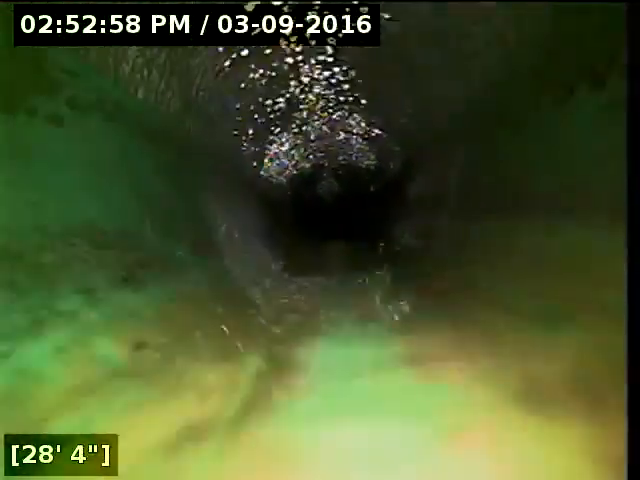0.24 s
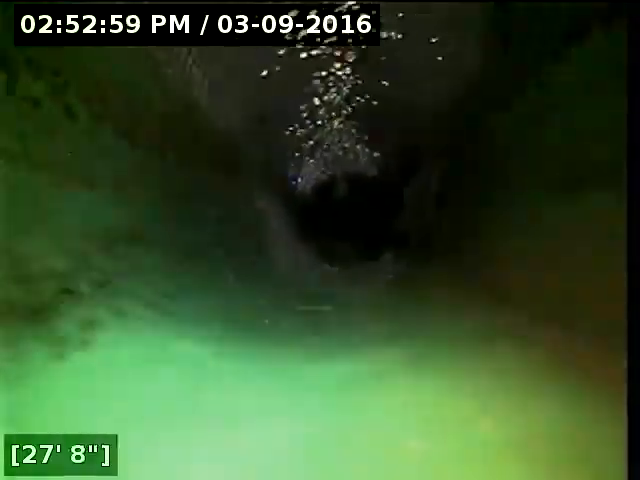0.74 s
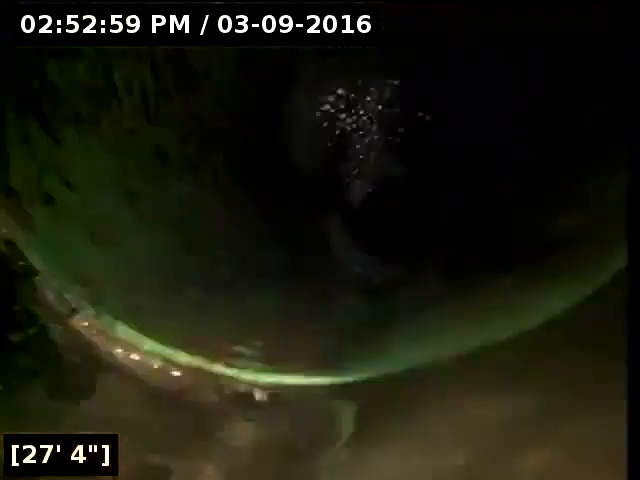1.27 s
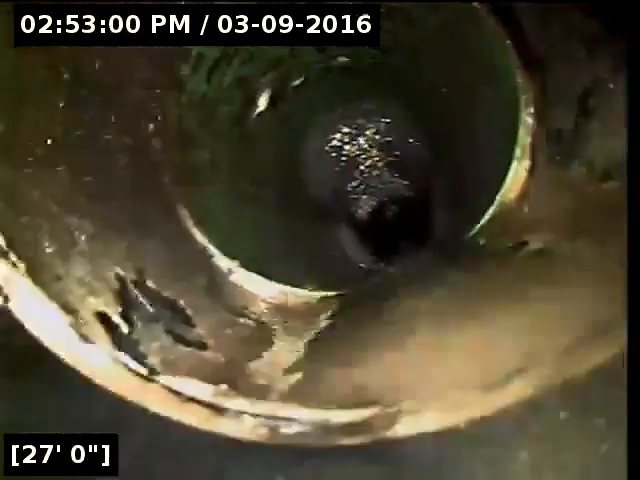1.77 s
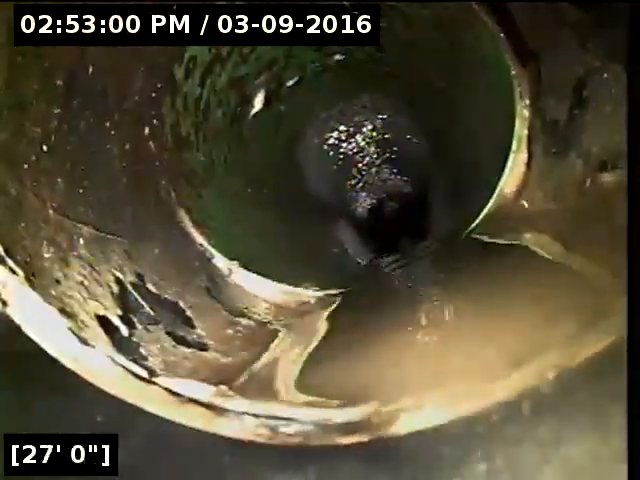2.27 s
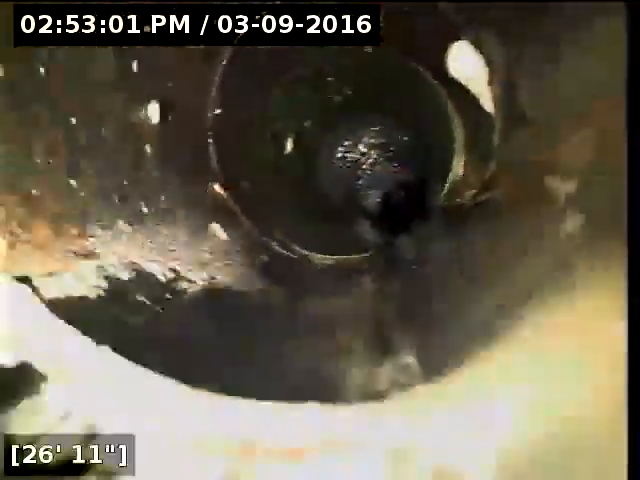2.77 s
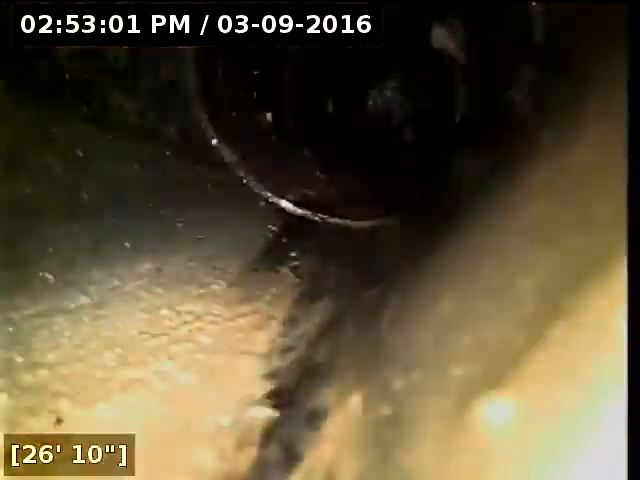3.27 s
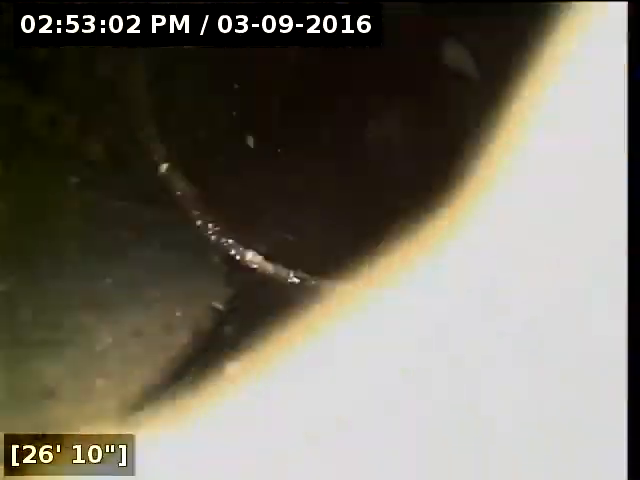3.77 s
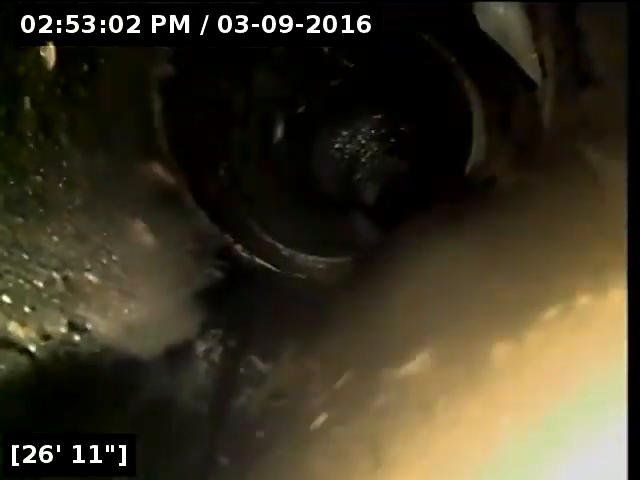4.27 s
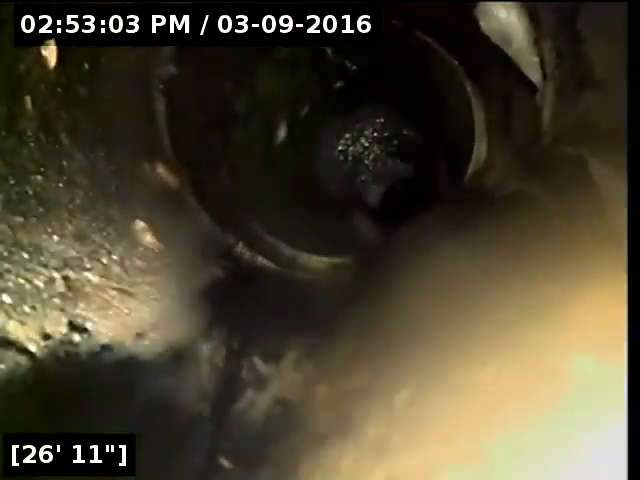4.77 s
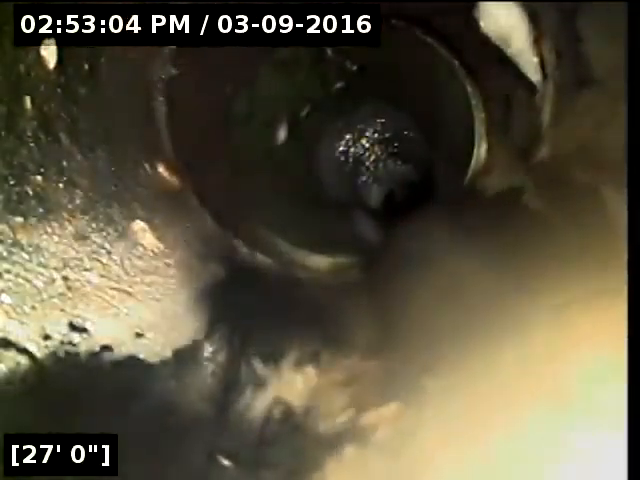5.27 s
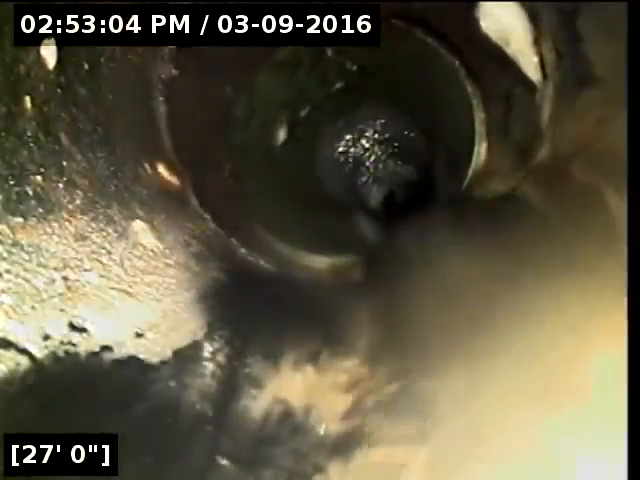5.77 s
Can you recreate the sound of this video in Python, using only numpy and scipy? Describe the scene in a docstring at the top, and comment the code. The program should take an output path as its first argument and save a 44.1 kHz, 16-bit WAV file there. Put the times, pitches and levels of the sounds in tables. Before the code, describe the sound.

A stiff drain camera cable is dragged back by hand, ticking and snapping over a dull rub, with an early knock and a loud late clatter.

```python
"""The stiff push cable of a drain inspection camera ticks and snaps against its reel as it is pulled back by hand.
Snaps are short damped rings; the reel frame, a set of modes struck or rubbed, knocks early and later clatters twice.
Under it lie the cable's rub and drone, one faint squeak with a thin whistle, a scrape, a low hum and hiss:
shaped noise and gliding lines. The small microphone of the monitor is narrow-band; the sound drops out once, briefly."""
import sys
import numpy as np
from scipy import signal
from scipy.fft import rfft, irfft
from scipy.io import wavfile
from scipy.ndimage import uniform_filter1d, map_coordinates

SR = 44100
rng = np.random.default_rng(int(sys.argv[2]) if len(sys.argv) > 2 else 0)


def inscribe(sig):
    """Save sig as 16-bit PCM at rate SR to the path in sys.argv[1].

    A 1-D sig is mono; a 2-D sig holds one channel per row.
    Samples are clipped to [-1, 1] before scaling.
    """
    pcm = np.round(np.clip(np.atleast_2d(sig).T, -1, 1) * 32767)
    wavfile.write(sys.argv[1], SR, pcm.astype(np.int16))


N = 265482


def amp(db):
    """Decibels to gain."""
    return 10 ** (np.asarray(db) / 20)


def evened(x, size=None):
    """Scales x so that its first samples (all by default) have rms 1."""
    return x / np.sqrt(np.mean(x[:size] ** 2) + 1e-20)


def read(points, hz):
    """Reads a table on a log-frequency axis."""
    f, value = np.transpose(points)
    return np.interp(np.log(hz + 1), np.log(f + 1), value)


def coloured(x, points):
    """Filters x by a spectrum in dB."""
    gain = amp(read(points, np.fft.rfftfreq(len(x), 1 / SR)))
    return irfft(rfft(x) * gain, len(x))


def softened(x, hz):
    """Low-pass: a contact of finite length cannot excite anything far above hz."""
    return signal.sosfilt(signal.butter(4, min(hz, SR / 3), fs=SR, output="sos"), x)


def add(mix, start_s, sound):
    """Lays a sound into the mix at start_s."""
    part = mix[max(round(start_s * SR), 0):][:len(sound)]
    part += sound[:len(part)]


def wander(knots_per_s):
    """Smooth random curve of rms 1 through so many random knots a second."""
    knots = rng.standard_normal(8000)
    return evened(map_coordinates(knots, [np.arange(N) * knots_per_s / SR], order=3, mode="wrap"))


def ring(t, hz, t60_s):
    """One mode: a sine that dies by 60 dB in t60_s."""
    return np.sin(2 * np.pi * hz * t) * amp(-60 * t / t60_s)


def contact(t, t60_s, rattle_db):
    """Force of a blow: one sharp push, then a dying rattle of tiny contacts at rattle_db relative to it."""
    force = rng.standard_normal(len(t)) * amp(-60 * t / t60_s)
    force *= amp(rattle_db) / np.linalg.norm(force)
    force[0] += 1
    return force


def tone(rows, rough, width_hz):
    """A gliding line, partly steady and partly blurred into narrow noise."""
    times, hz, db = np.transpose(rows)
    t = np.arange(N) / SR
    turn = np.exp(2j * np.pi * np.cumsum(np.interp(t, times, hz)) / SR)
    blur = 1 - rough + rough * (wander(width_hz) + 1j * wander(width_hz))
    gain = amp(np.interp(t, times, db, left=-120, right=-120))
    return gain * evened((turn * blur).real)


# How hard the sliding cable rubs. Each row: time in seconds, reference level in dB.
PULL_LEVELS = np.vstack([ [(0.0, -52), (0.42, -46.5), (0.53, -50.5), (1.31, -50.5), (1.58, -55),
               (1.85, -55), (2.11, -55), (2.24, -51), (2.9, -52.5)], [(3.45, -55.5), (3.64, -52),
               (4.18, -49), (4.35, -47), (4.59, -50), (4.8, -49.5), (5.18, -49), (5.4, -48.5), (6.02, -45)],
               ])


def pull(s):
    """Reference level of the rub in dB at time s."""
    return np.interp(s, *np.transpose(PULL_LEVELS))


# Noise spectra of the sliding cable. Each row: frequency in Hz, relative density in dB.
RUMBLE_SPECTRUM = [(15, -56.5), (25, -32), (64, -20.5), (92, -7), (124, -3.5), (182, -2.5), (270, -6),
                   (358, -5), (437, -1.5), (524, -9.5), (805, -3), (1050, -13.5), (1200, -9), (1300, -19),
                   (1690, -23.5), (2860, -120)]
RUB_SPECTRUM = [(600, 0), (1000, -5), (1220, 3.5), (1500, -0.5), (2200, -2), (2900, -5), (3400, -19),
                (3900, -19.5), (4500, -43.5)]
HISS_SPECTRUM = [(3000, -12), (4300, -5), (5000, -1), (5800, 0.5), (7000, -2.5), (7700, -8.5),
                 (8300, -15.5)]
# Cable runs faster through the hand. Each row: start in seconds, length in seconds, rub in dB, hiss in dB.
STROKE_SWELLS = [(-.05, 0.32, -67, -57.5), (0.71, .1, -44.5, -73), (0.864, 0.32, -60.5, -58.5),
                 (1.276, 0.23, -51, -63), (3.659, 0.092, -52.5, -65), (3.913, 0.46, -58, -61),
                 (4.62, 0.11, -61, -52), (5.03, 0.15, -52, -60), (5.735, 0.23, -46.5, -62)]
STROKE_EASE_S, STROKE_RUMBLE_DB = 0.039, -2  # swell and fall time; rumble relative to the stroke's rub
EASY_PULL_DB = -52  # rumble and hiss follow the pull above this by a share
RUMBLE_DB, RUMBLE_SHARE, HISS_DB, HISS_SHARE = -47.5, 0.06, -65.5, 0.48


def sliding(flutter_db=2.0, flutter_per_s=45, rub_db=-1.5):
    """Dull rumble and dry rub noise flutter together under a smooth hiss; each stroke adds a swell."""
    t = np.arange(N) / SR
    effort_db = pull(t) - EASY_PULL_DB
    rumble = amp(RUMBLE_DB + RUMBLE_SHARE * effort_db)
    rub = amp(pull(t) + rub_db)
    hiss = amp(HISS_DB + HISS_SHARE * effort_db)
    for start_s, length_s, stroke_db, hiss_db in STROKE_SWELLS:
        edge_s = np.minimum(t - start_s, start_s + length_s - t)
        swell = np.clip(edge_s / STROKE_EASE_S, 0, 1)
        rumble = np.hypot(rumble, amp(stroke_db + STROKE_RUMBLE_DB) * swell)
        rub = np.hypot(rub, amp(stroke_db) * swell)
        hiss = np.hypot(hiss, amp(hiss_db) * swell)
    flutter = flutter_db * wander(flutter_per_s)
    layers = [(RUMBLE_SPECTRUM, rumble * amp(0.58 * flutter)), (RUB_SPECTRUM, rub * amp(flutter)),
              (HISS_SPECTRUM, hiss)]
    return sum(gain * evened(coloured(rng.standard_normal(N), shape)) for shape, gain in layers)


FIZZ_DB, FIZZ_FROM_HZ, FIZZ_DB_PER_HZ = -25, 1450, 0.0115  # the higher a snap, the more it fizzes


def click(db, hz, fizz_db, body_db=-23, body_t60_s=0.023, crack_db=-5, crack_hz=2650,
          thud_db=-15, thud_hz=300, reach_hz=1550):
    """A snap of a few cycles with a sharp crack, the short ring of the coil behind it, and a bright fizz."""
    t = np.arange(2000) / SR
    # light ticks are short and gritty, hard snaps swell and ring cleanly
    hard = np.clip((db + 33.5) / 20, 0, 1)
    swell = 1 - np.exp(-t / (0.0001 + 0.00043 * hard))
    snap = ring(t, hz, 0.003 + 0.00078 * hard) * swell
    snap += amp(crack_db - 15.0 * hard) * ring(t, crack_hz, 0.0019)
    snap += amp(thud_db - 4.2 * hard) * ring(t, thud_hz, 0.0036)
    for ratio in (0.68, 0.85, 1.16):
        coil_hz = hz * ratio * rng.uniform(0.99, 1.063)
        snap += amp(body_db - 2.6 * hard) * rng.normal() * ring(t, coil_hz, body_t60_s)
    snap = signal.fftconvolve(contact(t, 0.038, -1 - 9 * hard), snap)[:len(t)]
    snap = softened(snap, hz + reach_hz)
    fizz = ring(t, 5400 * rng.uniform(0.92, 1.03), 0.0033) - 0.5 * ring(t, 7160, 0.0026)
    fizz = signal.fftconvolve(contact(t, 0.034, 0), fizz)[:len(t)]
    return amp(db) * evened(snap, size=220) + amp(fizz_db) * evened(fizz, size=220)


# Clear ticks and snaps. Each row: start in seconds, level in dB before the mix trim, pitch in Hz.
CABLE_SNAPS = [(0.4645, -40, 2170), (0.743, -36, 2380), (1.0483, -41.5, 1500), (1.3508, -35, 1380),
               (1.8131, -41, 1420), (2.037, -38.5, 1600), (2.1687, -39, 1250), (2.372, -44, 1870),
               (2.5557, -40.5, 1500), (2.637, -42, 1680), (2.8822, -40, 1420), (2.9104, -40.5, 1400),
               (2.9556, -41.5, 1520), (3.0273, -36, 1500), (3.2365, -45.5, 1800), (3.288, -39, 1770),
               (3.3069, -36.5, 1390), (3.591, -40.5, 1690), (3.8093, -44, 1510), (3.8994, -37.5, 1500),
               (3.906, -35.5, 1330), (3.9541, -40.5, 1410), (4.1455, -37.5, 1700), (4.1807, -30, 1900),
               (4.1958, -18, 1900), (4.2713, -36.5, 1650), (4.3005, -25.5, 1890), (4.3116, -27, 1290),
               (4.3216, -28.5, 1850), (4.3594, -36, 1270), (4.407, -18.5, 2000), (4.4968, -37.5, 2070),
               (4.6653, -33.5, 2130), (4.673, -37.5, 2040), (4.695, -36, 2060), (4.713, -35.5, 1710),
               (4.7638, -38.5, 2170), (4.8659, -30, 1460), (4.9638, -22.5, 2170), (5.511, -35, 1620),
               (5.5458, -36, 1930), (5.7539, -28, 3140), (5.8815, -43, 2960)]


def cable(count=220, grit_db=-1, spread_db=3, cap_db=7, loudest_db=-44):
    """The clear snaps, and random grit that follows the rubbing: mostly fine, now and then a small tick."""
    out, grit = np.zeros(N), []
    for when, size, pitch in rng.random((count, 3)):
        s = when * N / SR
        excess_db = min(-spread_db * np.log(1 - size), cap_db)
        db = pull(s) + grit_db + excess_db
        grit.append((s, min(db, loudest_db), 1100 + 1200 * pitch))
    for s, db, hz in list(CABLE_SNAPS) + grit:
        fizz_db = db + FIZZ_DB + FIZZ_DB_PER_HZ * (hz - FIZZ_FROM_HZ)
        add(out, s, click(db, hz, fizz_db))
    return out


# Blows on the reel frame. Each row: start in seconds, boom in Hz, boom in dB and clack in dB before the mix trim.
FRAME_BLOWS = [(0.188, 220, -35, -64), (0.272, 386, -16, -17.5), (0.2788, 321, -27, -30),
               (0.288, 371, -20, -20.5), (0.2936, 220, -17.5, -32.5), (0.308, 254, -21.5, -40),
               (0.63, 182, -32.5, -78), (0.762, 310, -39, -41), (1.309, 272, -40, -50),
               (4.5345, 428, -18.5, -16.5), (4.548, 412, -5.5, -17), (4.5672, 500, -18.5, -11.5),
               (4.575, 466, -16.5, -21.5), (4.5871, 433, -9, -18), (4.592, 416, -22.5, -19.5),
               (4.605, 435, -32, -18.5), (4.621, 480, -22, -22), (4.625, 520, -18.5, -24.5),
               (4.631, 462, -26.5, -16.5), (4.986, 245, -28, -25), (4.9933, 168, -24, -26.5),
               (5.0185, 278, -30, -27.5), (5.0417, 350, -29, -29.5), (5.056, 300, -38.5, -32),
               (5.496, 265, -34.5, -56), (5.7, 266, -35, -53), (5.816, 315, -28.5, -32.5),
               (5.901, 335, -35, -44)]
# Registers of the frame. Each row: low edge in Hz, high edge in Hz, rattle t60 in seconds,
# rattle in dB relative to the push, before a hard blow cleans it.
FRAME_REGISTERS = [(540, 1050, 0.027, -5.5), (1050, 4050, 0.025, 6), (4000, 7200, 0.025, 10)]
# Modes of the frame, for knocks and grinds. Each row: nominal frequency in Hz, relative level in dB, t60 in seconds.
FRAME_MODES = [(375, -11, .03), (443, -1.5, 0.034), (512, -4, 0.022), (595, -1.5, 0.025),
               (672, -1.5, 0.026), (741, -2, 0.027), (893, -1, 0.025), (1217, 2, 0.013), (1493, -2, 0.021),
               (1780, 4, 0.016), (2120, 0, 0.014), (2520, -4, 0.019), (2820, -5.5, 0.015),
               (3000, -4.5, 0.0048), (3470, -18, 0.0042), (4720, -1.5, 0.0051), (6080, 7.5, 0.0021),
               (6500, -4.5, 0.0038), (7040, -10, 0.0025)]
BODY_SHARE, BODY_DB = 0.78, -1  # the low register lies between boom and clack in level
FIZZ_BELOW_DB = -20.5  # the top register follows the clack


def knocks(detune=0.025, push_db=-8.0, push_s=0.0017, boom_t60_s=0.049, boom_rattle_db=-8, clean_db=5):
    """Each blow rings the frame's modes and a damped boom whose pitch depends on where it lands."""
    out, t = np.zeros(N), np.arange(6000) / SR
    for s, boom_hz, boom_db, clack_db in FRAME_BLOWS:
        body_db = BODY_DB + BODY_SHARE * boom_db + (1 - BODY_SHARE) * clack_db
        levels_db = [body_db, clack_db, clack_db + FIZZ_BELOW_DB]
        # a hard blow is more push than rattle
        clean = clean_db * np.clip((boom_db + 19) / 10, 0, 1)
        # booms above 250 Hz die sooner
        life_s = boom_t60_s * min(250 / boom_hz, 1) ** 1.7
        force = contact(t, 0.081, boom_rattle_db - clean)
        boom = signal.fftconvolve(force, ring(t, boom_hz, life_s))[:len(t)]
        band = signal.butter(2, [0.72 * boom_hz, 2.4 * boom_hz], "band", fs=SR, output="sos")
        add(out, s, amp(boom_db) * evened(signal.sosfilt(band, boom), size=300))
        for (lo, hi, t60_s, rattle_db), db in zip(FRAME_REGISTERS, levels_db):
            modes = sum(rng.choice([-1, 1]) * amp(mode_db) * ring(t, hz * (1 + detune * rng.normal()), mode_t60_s)
                        for hz, mode_db, mode_t60_s in FRAME_MODES if lo <= hz < hi)
            sound = signal.fftconvolve(contact(t, t60_s, rattle_db - clean), modes)[:len(t)]
            add(out, s, amp(db) * evened(softened(sound, 1.16 * hi), size=300))
        # the blow also shoves the case: one dull pulse
        u = t / push_s
        add(out, s, amp(min(boom_db, body_db) + push_db) * u * np.exp(1 - u))
    return out


# The cable grinds along the frame. Each row: start in seconds, hold in seconds, level in dB, release t60 in seconds.
GRIND_HOLDS = [(.267, 0.0056, -19, 0.086), (4.525, .101, -28.5, 0.039), (4.968, 0.015, -30.5, 0.073)]
SETTLE_DB, SETTLE_T60_S = -18, 0.39  # the loose coils go on shivering after a grind
GRIND_RISE_S = 0.002


def pressure():
    """Each grind bites at once, holds, lets go, and leaves a fainter shiver."""
    t, out = np.arange(N) / SR, np.zeros(N)
    for start_s, hold_s, db, t60_s in GRIND_HOLDS:
        after_s = np.maximum(t - start_s - hold_s, 0)
        shiver = amp(SETTLE_DB - 60 * after_s / SETTLE_T60_S)
        release = np.maximum(amp(-60 * after_s / t60_s), shiver)
        out += amp(db) * np.clip((t - start_s) / GRIND_RISE_S, 0, 1) * release
    return out


def grind(contacts_per_s=2500, spread_db=4, treble_db=-8):
    """A dense run of tiny slips keeps the frame's modes ringing."""
    t = np.arange(3000) / SR
    sizes = rng.standard_normal(N) * amp(spread_db * rng.standard_normal(N))
    slips = sizes * (rng.random(N) < contacts_per_s / SR)
    frame = sum(amp(db + treble_db * (hz > 4000)) * ring(t, hz, t60_s) for hz, db, t60_s in FRAME_MODES)
    force = evened(slips) * pressure()
    return signal.fftconvolve(force, frame / np.linalg.norm(frame))[:N]


# Low mode of the frame. Each row: time in seconds, pitch in Hz, level in dB.
DRONE_LINE = [(.32, 233.4, -37), (.42, 231.7, -56), (.6, 247, -61), (.77, 268, -48.5), (1.07, 265, -51),
              (1.2, 263, -78), (1.33, 264, -45), (1.5, 260, -69)]


def drone():
    """The sliding cable makes the frame drone on a low mode: a blurred gliding line."""
    return tone(DRONE_LINE, rough=0.59, width_hz=73)


# Low hum. Each row: time in seconds, pitch in Hz, level in dB.
HUM_LINE = [(3.1, 103, -64), (3.3, 102, -53.5), (4.1, 101.3, -54), (5.2, 99.5, -60), (6.02, 100.6, -65)]


def hum():
    """A low line, about half steady, that drifts slightly in pitch."""
    return tone(HUM_LINE, rough=0.55, width_hz=16)


# Squeak of the cable in its guide. Each row: time in seconds, pitch in Hz, level in dB.
SQUEAK_LINE = [(3.66, 390, -60), (3.71, 400, -45), (3.745, 421, -49), (3.78, 439, -49), (3.83, 487, -45),
               (3.88, 460, -47), (3.93, 443, -55)]
# Thin, high whistle at its start. Each row: time in seconds, pitch in Hz, level in dB.
WHISTLE_LINE = [(3.65, 5150, -74), (3.685, 5250, -55), (3.73, 5250, -69), (3.77, 5300, -73)]


def squeak():
    """The cable squeaks in its guide: a rough gliding line, with a whistle of narrow noise at its start."""
    return tone(SQUEAK_LINE, rough=0.93, width_hz=88) + tone(WHISTLE_LINE, rough=1.0, width_hz=380)


# Scrape of the cable. Each row: time in seconds, pitch in Hz, level in dB.
SCRAPE_LINE = [(5.08, 2116, -56), (5.2, 2110, -55.5), (5.42, 2146, -53), (5.55, 2096, -64),
               (5.64, 2110, -55), (5.8, 2140, -50), (6.02, 2090, -61)]


def scrape():
    """A thin whistling scrape as the cable runs on: a line blurred almost wholly into narrow noise."""
    return tone(SCRAPE_LINE, rough=0.96, width_hz=270)


# Decay of the room. Each row: frequency in Hz, t60 in seconds.
ROOM_DECAY = [(150, 0.36), (400, 0.15), (1000, 0.23), (2500, 0.2), (8000, 0.088)]


def room(x):
    """A short, dull tail from the walls close by: noise that dies at its own rate in each band."""
    hz, t, z = signal.stft(rng.standard_normal(SR // 2), SR, nperseg=256)
    decay = amp(-60 * t / read(ROOM_DECAY, hz)[:, None])
    tail = signal.istft(z * decay, SR, nperseg=256)[1]
    tail[:300] = 0  # samples before the first reflection
    return signal.fftconvolve(x, tail / np.linalg.norm(tail))[:N]


def scene():
    """Knocks, grinds and snaps in the room, over the sliding cable and its tones."""
    hits = amp(-1.5) * knocks() + grind() + amp(0.5) * cable()
    rubbing = sliding() + drone()
    return (hits + amp(-20.5) * room(hits) + rubbing + squeak() + scrape() + hum())[None]


# Response of the microphone. Each row: frequency in Hz, gain in dB.
MIC_RESPONSE = [(20, -5), (3400, 1), (3850, -8.5), (4010, -29.5), (4200, -7), (4700, -2.5), (7600, -0.5),
                (8100, -4), (8500, -28)]
# The dropout: start in seconds, end in seconds.
DROPOUT_SPAN_S = (3.116, 3.226)
EDGE_HZ = 8500


def record(dry):
    """A narrow-band microphone channel with a notch, soft overload and one short dropout."""
    t = np.arange(N) / SR
    silent = (t > DROPOUT_SPAN_S[0]) & (t < DROPOUT_SPAN_S[1])
    live = uniform_filter1d(1.0 - silent, size=40)
    overloaded = 1.297 * np.tanh(dry[0] / 1.263)
    x = coloured(overloaded, MIC_RESPONSE) * live
    low_pass = signal.firwin(301, EDGE_HZ, window=("kaiser", 8), fs=SR)
    return signal.oaconvolve(x, low_pass, "same")[None]


dry = scene()
out = record(dry)
inscribe(out)
```